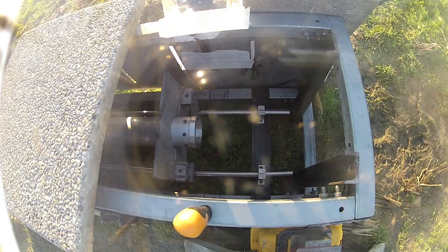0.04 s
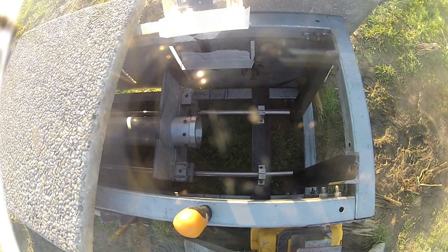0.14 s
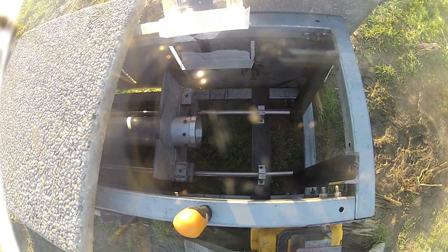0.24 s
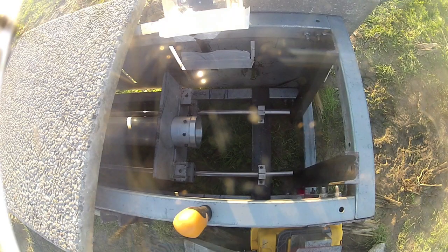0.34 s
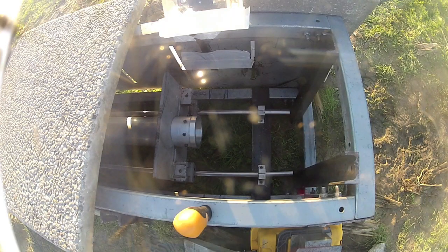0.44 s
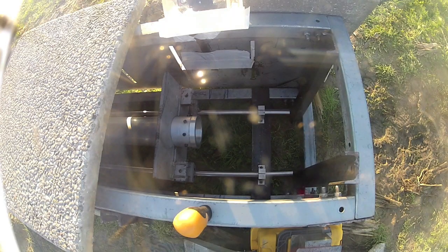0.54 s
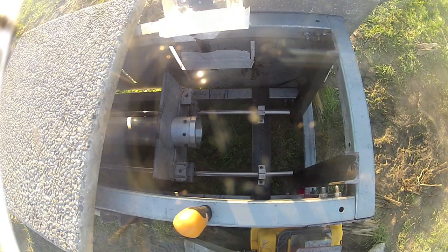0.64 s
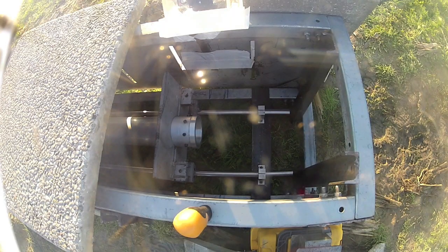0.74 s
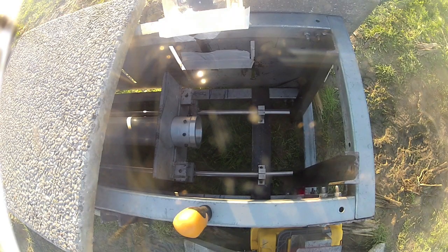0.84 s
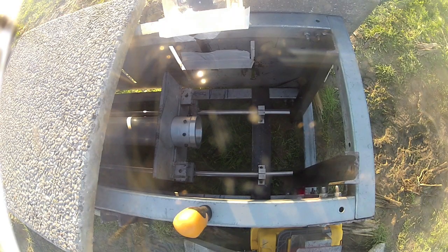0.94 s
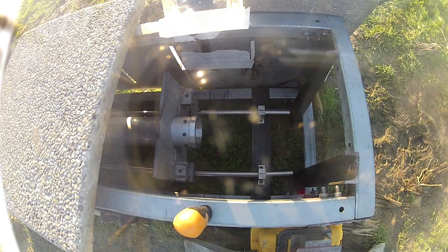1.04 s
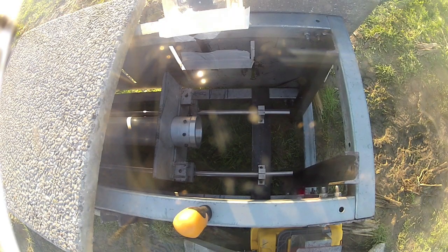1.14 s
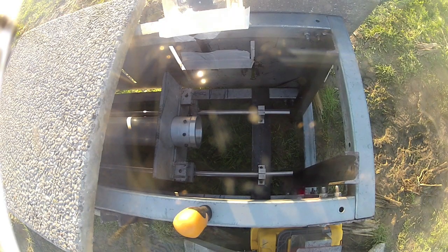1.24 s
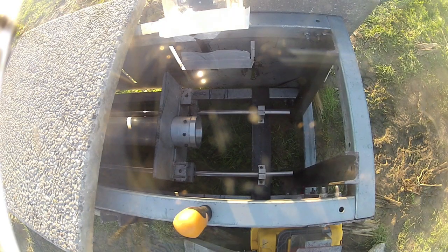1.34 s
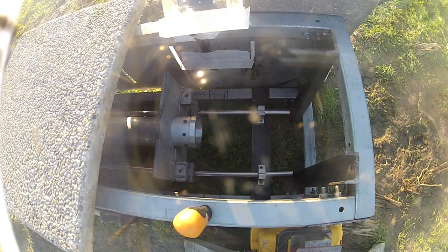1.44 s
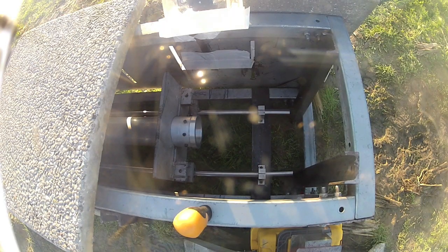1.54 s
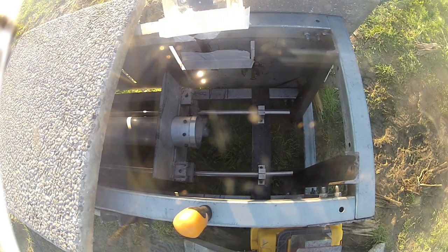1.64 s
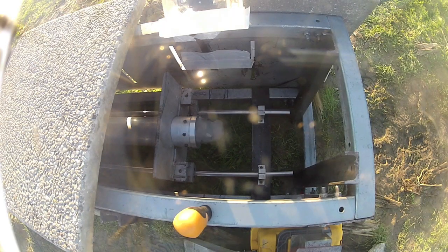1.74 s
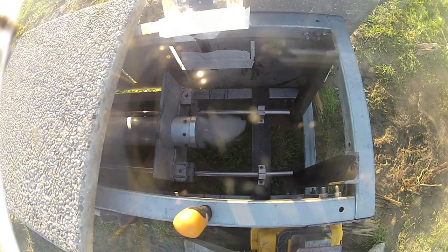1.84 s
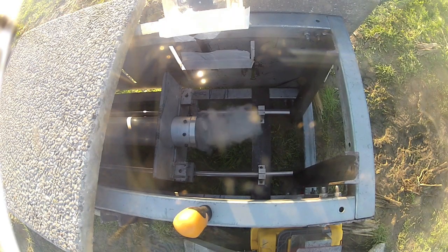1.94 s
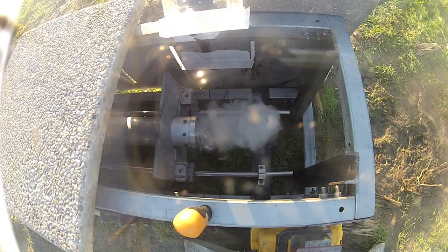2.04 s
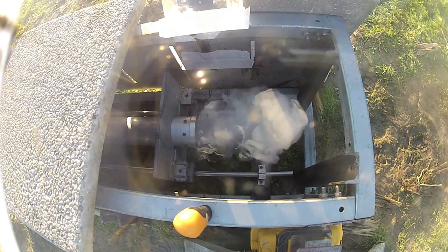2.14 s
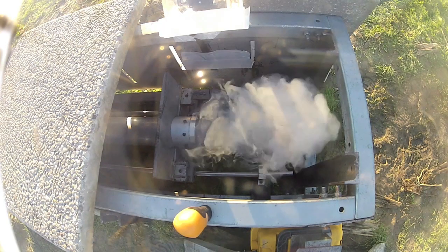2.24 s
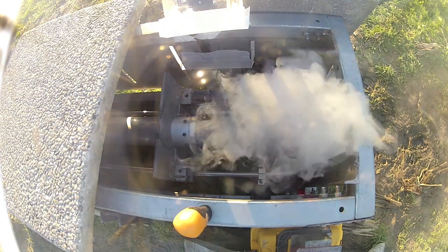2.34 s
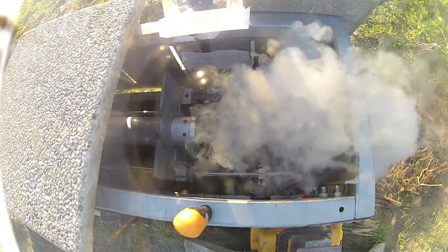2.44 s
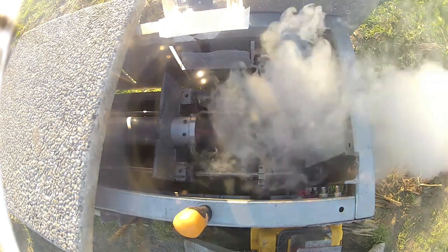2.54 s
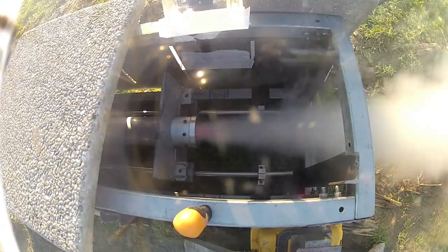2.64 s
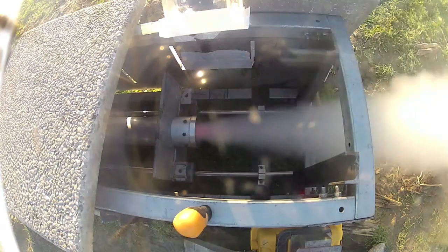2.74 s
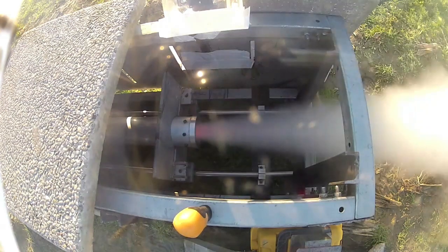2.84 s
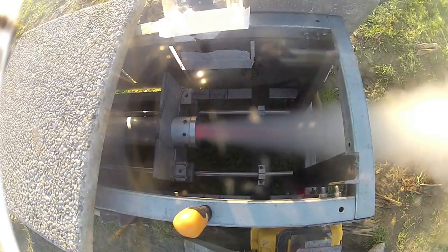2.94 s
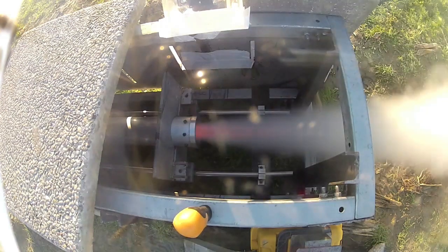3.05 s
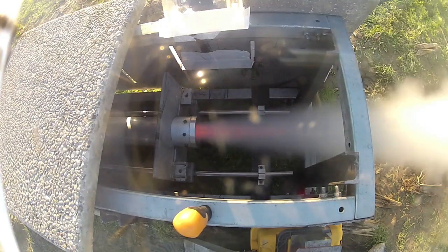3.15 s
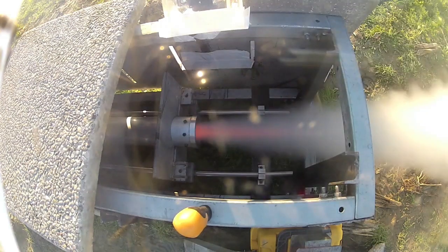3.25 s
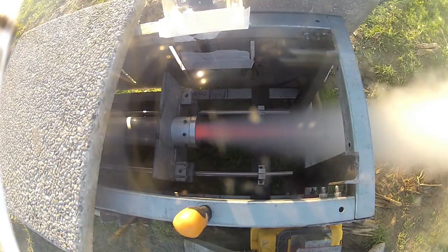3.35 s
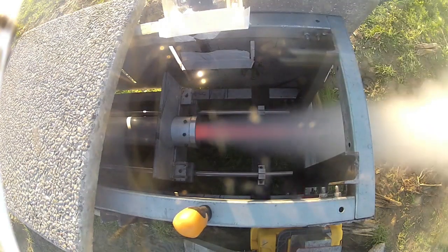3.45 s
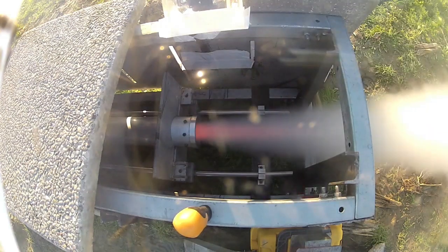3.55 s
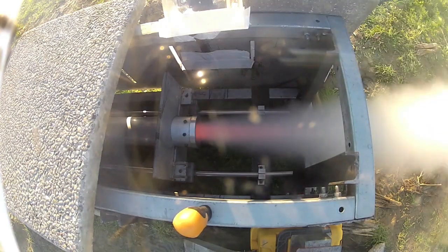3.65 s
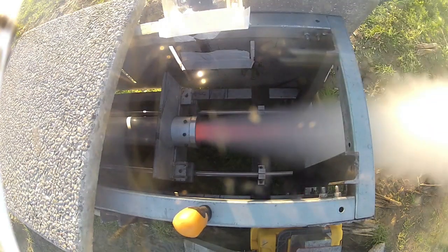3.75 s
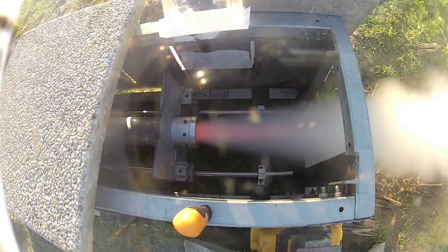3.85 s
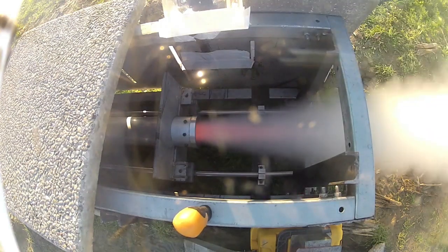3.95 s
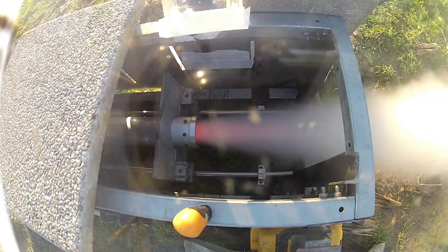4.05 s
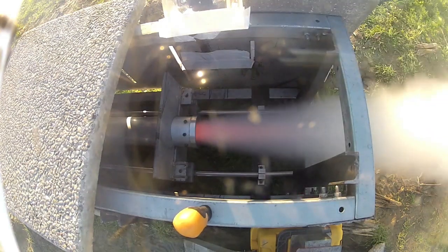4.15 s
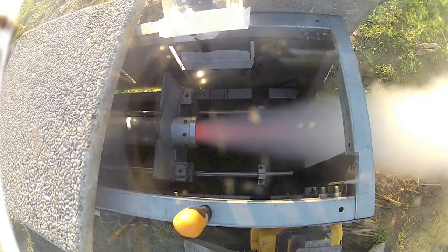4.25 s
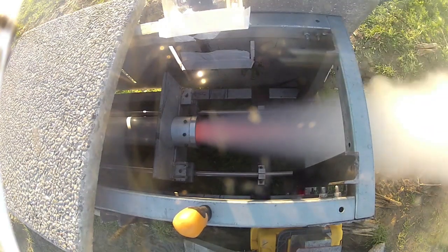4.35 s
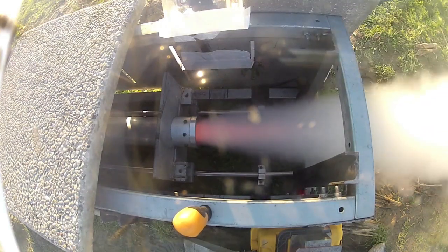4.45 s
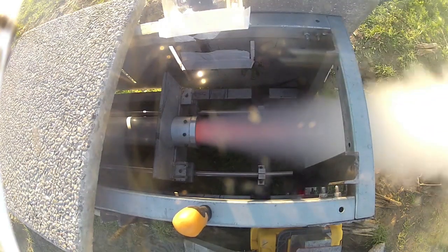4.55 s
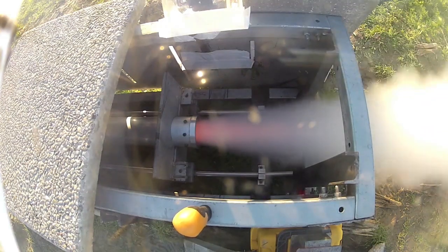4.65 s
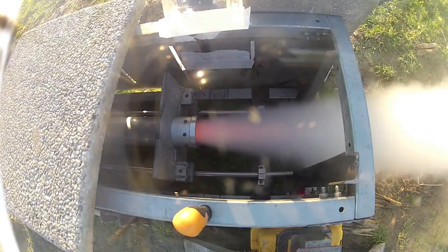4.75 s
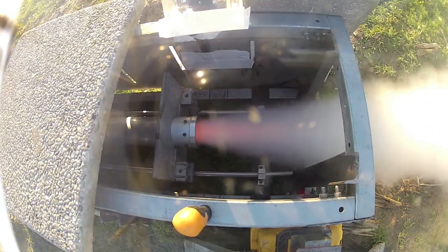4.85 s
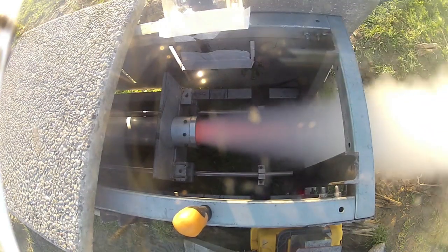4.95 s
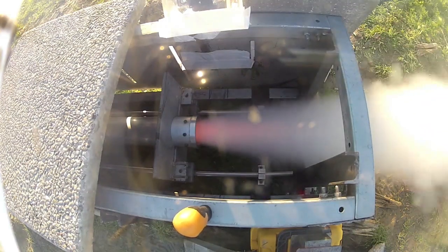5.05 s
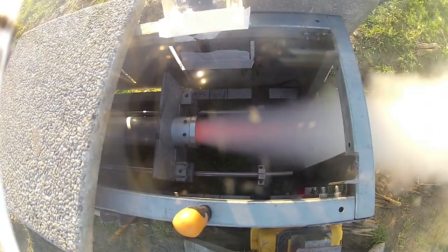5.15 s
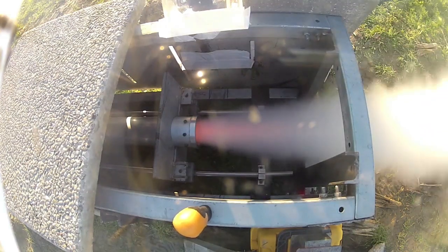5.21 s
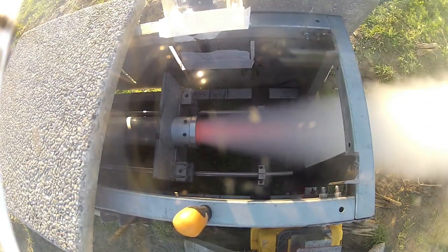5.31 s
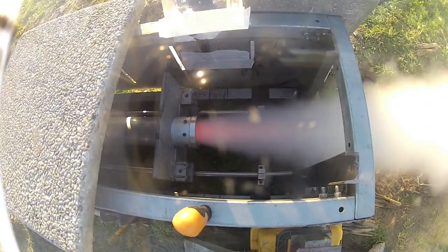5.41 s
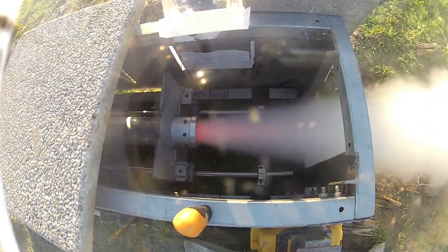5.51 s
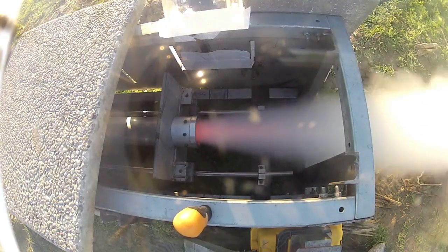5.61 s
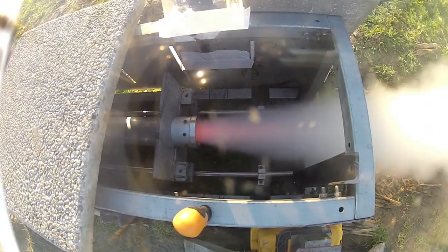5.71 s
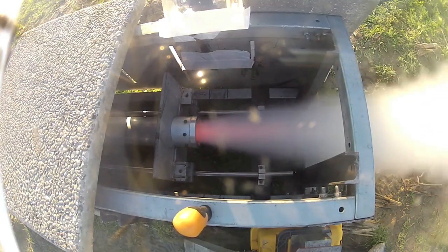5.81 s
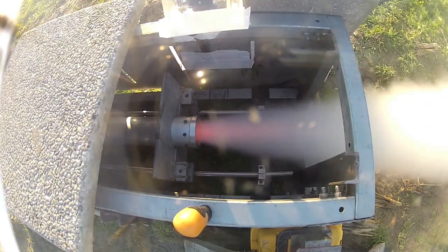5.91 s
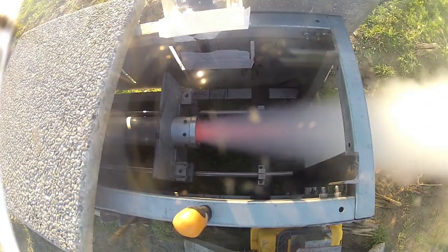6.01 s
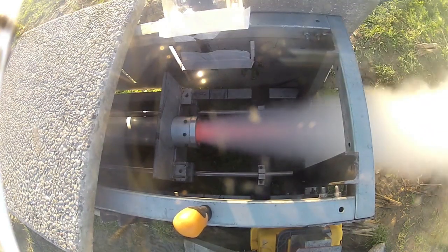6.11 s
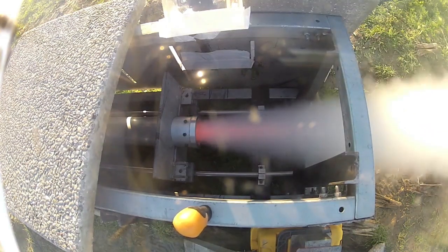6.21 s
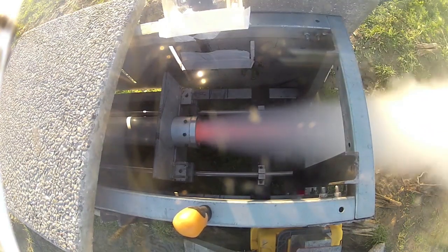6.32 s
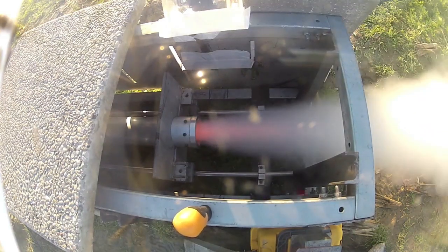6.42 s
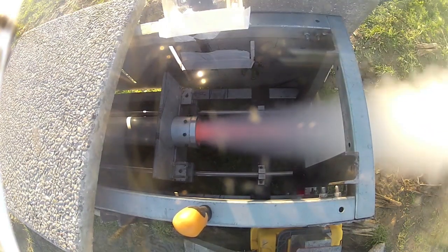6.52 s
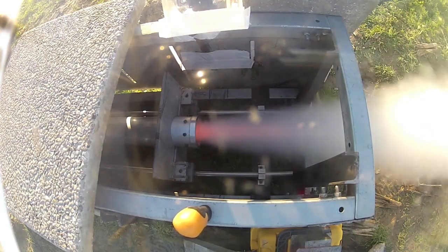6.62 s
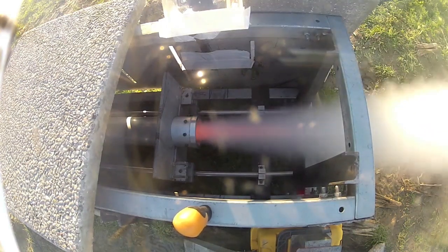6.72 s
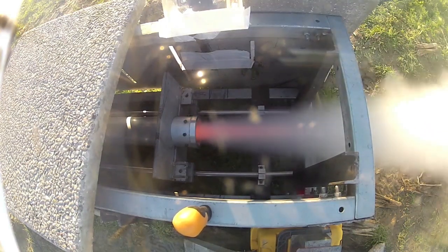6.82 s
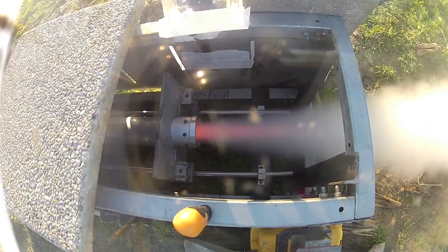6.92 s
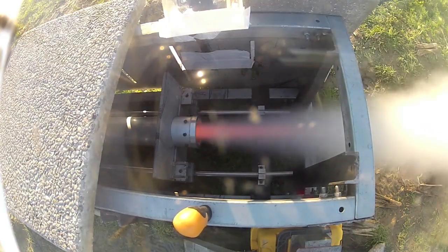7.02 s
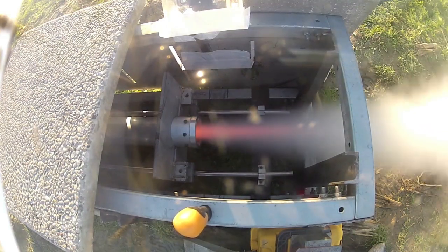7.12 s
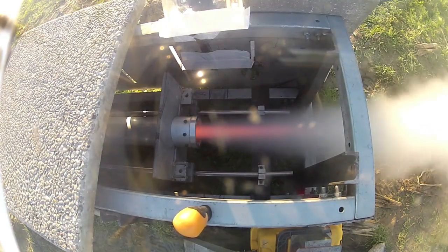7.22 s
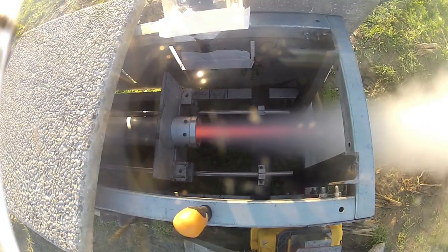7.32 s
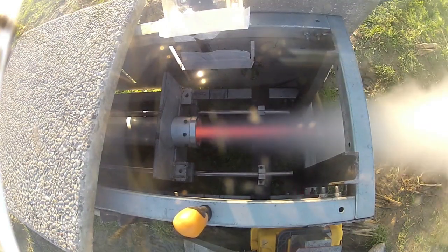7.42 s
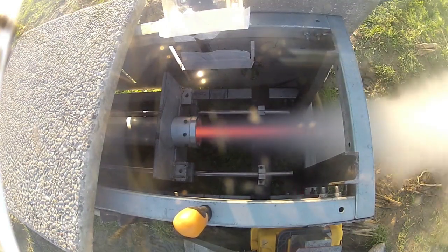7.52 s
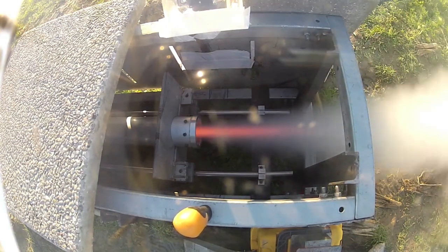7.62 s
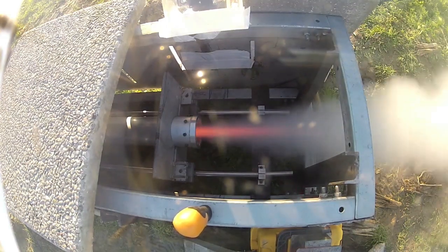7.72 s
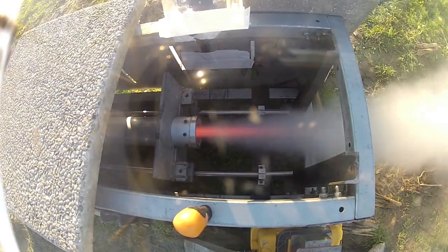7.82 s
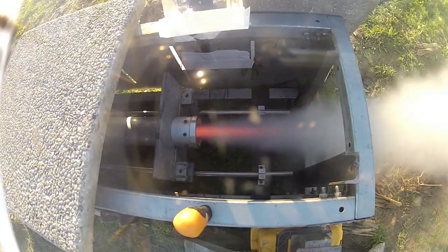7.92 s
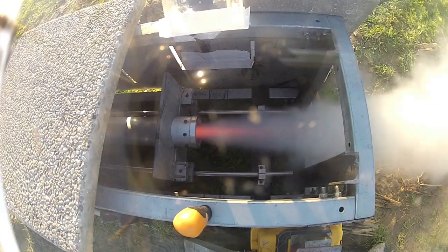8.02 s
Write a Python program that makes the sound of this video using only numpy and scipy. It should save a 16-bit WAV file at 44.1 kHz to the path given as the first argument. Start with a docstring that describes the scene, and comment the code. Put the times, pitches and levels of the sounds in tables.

```python
"""A small solid rocket motor firing in a steel test stand, outdoors, close to a camera's microphone.
Over quiet air and a far machine the igniter pops; a second later gas starts to blow through the nozzle,
then the turbulent jet roars steadily, with a few dull thumps, and sags near the end.
The stand and camera housing colour the jet; the recorder holds each sample, which mirrors the sound
into the treble."""
import sys
import numpy as np
from scipy.fft import rfft, irfft, next_fast_len
from scipy.io import wavfile
from scipy.ndimage import uniform_filter1d, map_coordinates

SR = 44100
rng = np.random.default_rng(int(sys.argv[2]) if len(sys.argv) > 2 else 0)


def generate_wav(sig):
    """Save sig (samples, or channels by samples) to the path in sys.argv[1] as 16-bit PCM at SR."""
    pcm = np.round(np.clip(np.atleast_2d(sig).T, -1, 1) * 32767).astype(np.int16)
    wavfile.write(sys.argv[1], SR, pcm)


N = 355887
T = np.arange(N) / SR


def amp(db):
    """Decibels to gain."""
    return 10 ** (np.asarray(db) / 20)


def unit(x):
    """x scaled to rms 1."""
    return x / np.sqrt(np.mean(x ** 2) + 1e-20)


def gain_at(spectrum, hz):
    """Gain of (f/Hz, level/dB) points, read on a log frequency axis."""
    f, db = np.transpose(spectrum)
    return amp(np.interp(np.log(hz + 1), np.log(f + 1), db))


def below(hz, edge_hz, order):
    """Power passed by a steep low-pass."""
    return 1 / (1 + (hz / edge_hz) ** (2 * order))


def bell(centre_s, width_s):
    """A smooth bump of height 1."""
    return np.exp(-.5 * ((T - centre_s) / width_s) ** 2)


def swell(peak_s, peak_db, rise_db_per_s, fall_db_per_s):
    """A gain that rises to a peak and falls away."""
    before, after = np.maximum(peak_s - T, 0), np.maximum(T - peak_s, 0)
    return amp(peak_db - rise_db_per_s * before - fall_db_per_s * after)


def wobble(rate):
    """A smooth random curve, rate knots a second."""
    return map_coordinates(rng.standard_normal(int(N * rate / SR) + 4), [T * rate])


def flutter(depth_db, rate):
    """A random gain of rms 1: eddies passing."""
    return unit(amp(depth_db * wobble(rate)))


def filtered(x, response):
    """x times a response of frequency."""
    size = next_fast_len(N + SR // 2)
    return irfft(rfft(x, size) * response(np.fft.rfftfreq(size, 1 / SR)), size)[:N]


def noise(response):
    """Coloured noise of rms 1."""
    return unit(filtered(rng.standard_normal(N), response))


def shaped_noise(spectrum):
    """Noise of rms 1 shaped by (f/Hz, level/dB) points."""
    return noise(lambda f: gain_at(spectrum, f))


def resonant(modes):
    """Noise of rms 1 ringing in (f/Hz, width/Hz, level/dB) resonances."""
    return noise(lambda f: sum(amp(db) * 1j * f * width / (hz * hz - f * f + 1j * f * width)
                               for hz, width, db in modes))


def blast(spectrum, size=8192):
    """The sharpest causal pulse with this spectrum, peak 1."""
    cepstrum = irfft(np.log(gain_at(spectrum, np.fft.rfftfreq(size, 1 / SR))))
    cepstrum[1:size // 2] *= 2
    cepstrum[size // 2 + 1:] = 0
    pulse = irfft(np.exp(rfft(cepstrum)))
    return pulse / np.abs(pulse).max()


# Open air around the microphone, spectrum: f/Hz, level/dB
AIR_SPECTRUM = [(20, -29), (55, -2), (120, -4), (200, -4.5), (330, -7), (450, -10.5), (600, -17.5),
                (1400, -21), (2500, -26), (5000, -28.5), (5600, -33), (6000, -55)]
# Tones of a machine far off: f/Hz, level/dB
MACHINE_TONES = [(118.4, -71.5), (177.6, -68), (231.5, -66.5), (344.5, -69.5), (1518, -83), (2250, -88)]

def outdoors():
    """Quiet air on site and the slightly unsteady hum of a distant machine."""
    hum = sum(amp(db + 1.6 * wobble(3.5)) * np.sqrt(2) * np.sin(2 * np.pi * hz * T + 0.67 * wobble(5.1))
              for hz, db in MACHINE_TONES)
    return amp(-59.5) * shaped_noise(AIR_SPECTRUM) + hum


# Paths to the microphone, direct and off the stand's walls: delay/s, gain
WALL_PATHS = [(0, 1), (.0068, 0.35), (0.0144, .13), (0.0178, .08)]

def bounced(spectrum, start_s):
    """A pulse and its bounces between the walls of the stand."""
    pulse = blast(spectrum)
    pulse_t = np.arange(len(pulse)) / SR
    return sum(gain * np.interp(T - start_s - delay, pulse_t, pulse, left=0, right=0)
               for delay, gain in WALL_PATHS)


# The igniter's pop and its spit of gas at close range, spectra: f/Hz, level/dB
POP_SPECTRUM = [(25, -31), (60, -2), (150, 3.5), (290, 7), (400, -2.5), (600, -14.5), (900, -44),
                (1500, -49), (2600, -58), (5500, -76)]
SPIT_SPECTRUM = [(100, -10), (500, 9), (750, 2), (1400, 1), (2000, -2), (2350, -5), (2600, -17),
                 (3200, -23), (3600, -29), (5500, -35)]
# Ringing modes of the steel stand: f/Hz, level/dB, t60/s
STAND_MODES = [(57.9, -46, 1.4), (74.6, -41, 0.54), (231, -43, 0.3), (345, -62, 0.55), (843, -49, 0.27),
               (944, -45, 0.25), (1030, -56, .25), (2220, -36, 0.095), (2310, -38.5, 0.099),
               (3200, -50, .06)]

def igniter(start_s=1.0842):
    """A dull pop and a spit of gas: the pop bounces, scatters outside and leaves the stand ringing."""
    pop = -amp(-12) * bounced(POP_SPECTRUM, start_s)
    age = np.maximum(T - start_s, 0)
    rise = 1 - np.exp(-(age / 0.0029) ** 2)

    def decay(db, t60_s):
        return amp(db - 60 * age / t60_s)

    ring = sum(decay(db, t60) * np.sin(2 * np.pi * hz * age) for hz, db, t60 in STAND_MODES)
    spit = shaped_noise(SPIT_SPECTRUM) * decay(db=-26, t60_s=0.073)
    scatter = shaped_noise([(40, -20), (250, 4), (600, -11), (1100, -16), (2500, -28), (5000, -50)])
    return pop + rise * (ring + spit + scatter * decay(db=-42, t60_s=0.25))


# Resonances of the motor case: f/Hz, width/Hz, level/dB
CASE_MODES = [(640, 33, 8), (970, 35, 1), (1310, 90, -11), (1670, 78, -11), (2290, 130, -15)]

def venting():
    """The first slow gas blows hollow notes in the case; the plume then shoves and buffets the air."""
    notes = filtered(resonant(CASE_MODES), lambda f: np.sqrt(below(f, edge_hz=2550, order=6)))
    flow = swell(peak_s=2.63, peak_db=-38.5, rise_db_per_s=60, fall_db_per_s=50)
    shove = swell(peak_s=2.62, peak_db=-44, rise_db_per_s=393, fall_db_per_s=95)
    # Buffeting comes after mid-burn, and again as the jet weakens.
    buffet = amp(-54.5) * bell(5.6, width_s=0.83) + amp(-54) * bell(T[-1], width_s=.2)
    return flow * notes + (shove + buffet) * resonant([(62, 40, 0)])


# Puffs from the nozzle: t/s, level/dB, width/s
PUFFS = [(2.618, -21, .012), (2.646, -23, 0.011), (2.81, -25, 0.021), (2.866, -23, 0.025),
         (3.753, -21, 0.006), (4.144, -40, .015), (5.077, -22, 0.0057), (5.459, -28, 0.0064),
         (8.041, -28, .016)]
# Thumps in the exhaust: t/s, peak level/dB
EXHAUST_THUMPS = [(3.75, -14), (5.071, -20), (5.457, -18.5)]
# One thump at close range, spectrum: f/Hz, level/dB
THUMP_SPECTRUM = [(30, -25), (90, -13), (160, -6), (290, 1.5), (450, -2), (560, -20), (750, -30),
                  (1000, -30), (3000, -48), (6000, -70)]

def surges():
    """Each surge of the burn throws out a dull puff; a few thump, perhaps slag passing the nozzle."""
    puffs = sum(amp(db) * bell(at_s, width_s) for at_s, db, width_s in PUFFS)
    gas = shaped_noise([(20, -11), (70, -3), (300, 7), (600, -8), (1200, 13), (2500, -1)])
    thumps = sum(amp(db) * bounced(THUMP_SPECTRUM, at_s) for at_s, db in EXHAUST_THUMPS)
    return thumps + puffs * gas


# Brief dips in the roar and hiss: t/s, depth/dB
ROAR_DIPS = [(3.395, 2), (3.495, 3), (3.625, 2), (4.245, 3), (4.497, 0), (5.768, 5), (6.295, 2),
             (6.56, 3.5), (7.138, 5), (7.725, -0.5)]

def dips(swell_share=0.31, lead_s=0.024, recover_s=0.054):
    """A gain that swells briefly, drops at once and recovers more slowly at each dip."""
    def shape(age):
        lead_in = swell_share * np.exp(-np.abs(age) / lead_s)
        drop = -np.exp(-np.abs(age) / recover_s)
        return np.where(age < 0, lead_in, drop)

    level_db = sum(depth * shape(T - at_s) for at_s, depth in ROAR_DIPS)
    return amp(uniform_filter1d(level_db, size=350))


# The jet at close range, spectrum: f/Hz, level/dB
JET_SPECTRUM = [(20.0, -37), (45.0, -35.5), (100.0, -22.5), (220.0, -18.5), (550.0, -19), (850.0, -17.5),
                (1100.0, -8), (1250.0, 0.0), (2000.0, -0.2), (2600.0, -7.5), (3800.0, -6), (4300.0, -16.5),
                (6000.0, -19)]
# Peaks and notches of the stand and the camera housing at the microphone: f/Hz, width/Hz, level/dB
HOUSING_COLOUR = [(65, 12, 16.5), (160, 34, 5.0), (298, 125, 15.5), (375.4, 33, -11), (438, 100, 15),
                  (631, 46, 6), (740, 35, -9), (967, 33, 8.5), (1011, 37, -14), (1540, 150, 2),
                  (1962, 65, 6.5), (2228, 287, 16), (2351, 28, 5.5), (2740, 120, -3.5), (2891, 124, 9.5),
                  (3200, 52, 6.5), (3254, 64, -10.5), (3670, 20, 6.5), (3976, 194, 11.5), (4260, 100, -7),
                  (4474, 140, 12.5), (4766, 70, 6), (4930, 173, 12.5), (5200, 99, 10), (5320, 100, 10),
                  (5477, 96, 12.5), (5780, 145, 10.5)]

def jet_band(low_hz, high_hz):
    """Turbulence between two frequencies, coloured by the stand and housing; rms 1."""
    def colour(f):
        lift_db = sum(db / (1 + (2 * (f - hz) / width) ** 2) for hz, width, db in HOUSING_COLOUR)
        band_power = np.abs(below(f, high_hz, order=16) - below(f, low_hz, order=16))
        return gain_at(JET_SPECTRUM, f) * amp(lift_db) * np.sqrt(band_power)
    return noise(colour)


# The burn builds, overshoots, holds and tails off: t/s, level/dB against the steady burn
THRUST_CURVE = [(2.1, -65), (2.4, -44), (2.51, -20), (2.57, -1.5), (2.63, 3), (2.72, 0.14), (3.1, 0),
                (7.58, 0), (7.81, -3), (7.88, -6), (8.07, -8.5)]

def jet(choke_s=2.59, choke_rise_s=0.0072):
    """Close up, thrust drives all: eddies rumble, the plume roars, shocks hiss once the nozzle chokes."""
    thrust_db = np.interp(T, *np.transpose(THRUST_CURVE), left=-120)
    choked = .5 + .5 * np.tanh((T - choke_s) / (2 * choke_rise_s))
    flare = bell(2.7, width_s=0.072)  # the fresh plume roars lower and sizzles
    midburn = bell(5, width_s=0.95)  # the jet darkens in the middle of the burn
    mellow_db = 9.5 * np.tanh(np.maximum(-thrust_db, 0) / 11)  # a weak jet sounds deeper
    low_lift_db = mellow_db + 1.8 * midburn

    low_weight = amp(-6 + low_lift_db + 3.5 * flare)
    plume = (low_weight * jet_band(700, 1794) + jet_band(1834, 2570)) / np.sqrt(1 + low_weight ** 2)
    shocks = amp(-22) * jet_band(2490, 7100) + amp(-28.5) * flare * jet_band(4300, 6600)
    leak = amp(-41 + thrust_db) * (1 - choked) * jet_band(2600, 6600)  # thin hiss before choking

    # The hiss falls steeply as thrust weakens; the rumble holds up and fades only at very low thrust.
    rumble_gain = amp(-34.5 + 0.53 * thrust_db + low_lift_db) * np.maximum(choked, amp(-13.5))
    hiss_gain = amp(1.9 * thrust_db - 2.5 * midburn) * np.maximum(choked, amp(-17))
    rumble = rumble_gain * jet_band(10, 860)
    rumble *= flutter(depth_db=1.2, rate=40) * flutter(depth_db=-0.75, rate=7)
    roar = amp(-17.5 + thrust_db) * plume * flutter(depth_db=.7, rate=67)
    hiss = hiss_gain * shocks * flutter(depth_db=0.3, rate=380)
    return rumble + (roar + hiss + leak) * dips() * flutter(depth_db=0.43, rate=28)


def scene():
    """Everything at the one microphone, close to the stand."""
    return (igniter() + venting() + jet() + surges() + outdoors())[None]


def record(dry):
    """The camera's sample and hold mirrors the sound around the hold rate, drooping as a sinc."""
    hold_hz, band_limit_hz = 12000, 15450
    base = filtered(dry[0], lambda f: np.sqrt(below(f, hold_hz / 2, order=50)))
    mirrored = base * (1 + 2 * np.cos(2 * np.pi * hold_hz * T))
    return filtered(mirrored, lambda f: np.sinc(f / hold_hz) * below(f, band_limit_hz, order=120))[None]


dry = scene()
out = record(dry)
generate_wav(out)
```